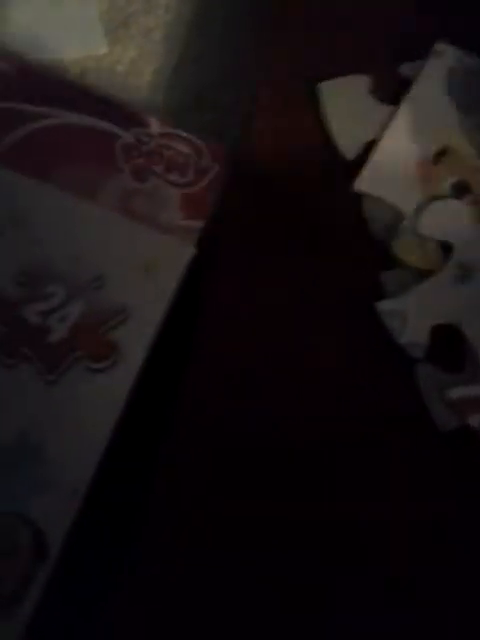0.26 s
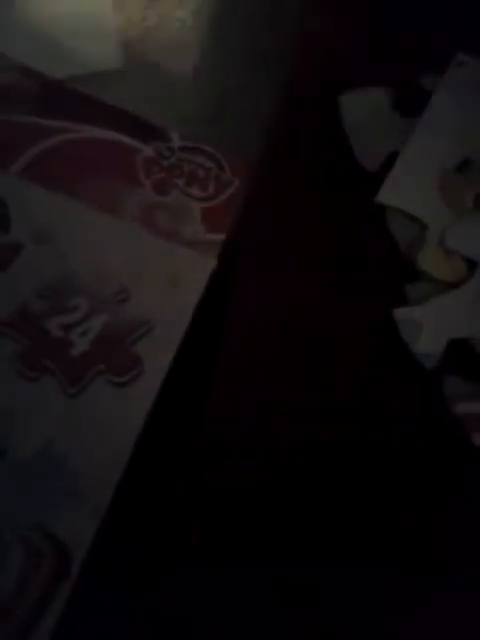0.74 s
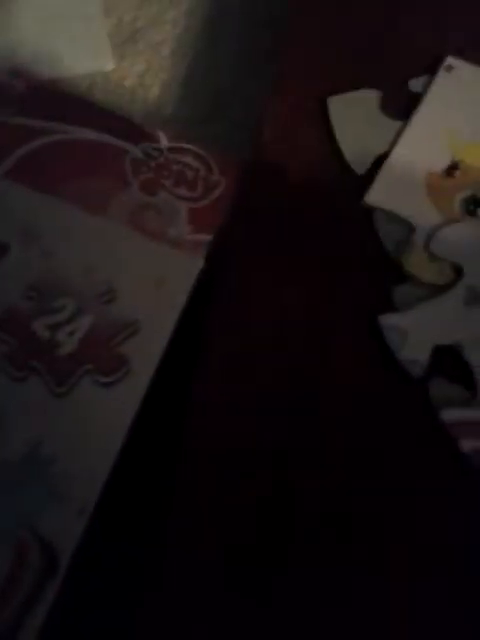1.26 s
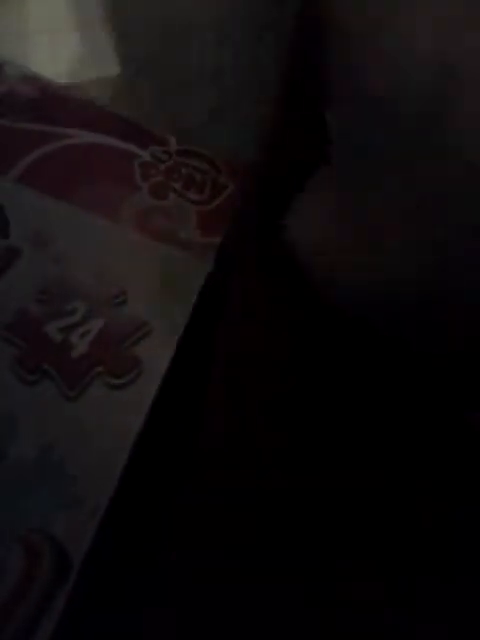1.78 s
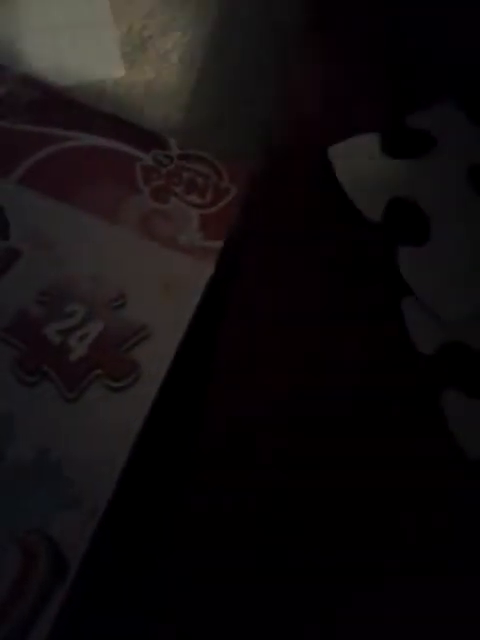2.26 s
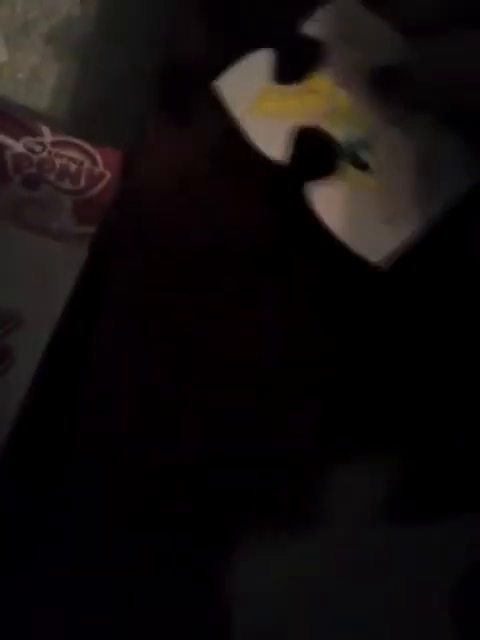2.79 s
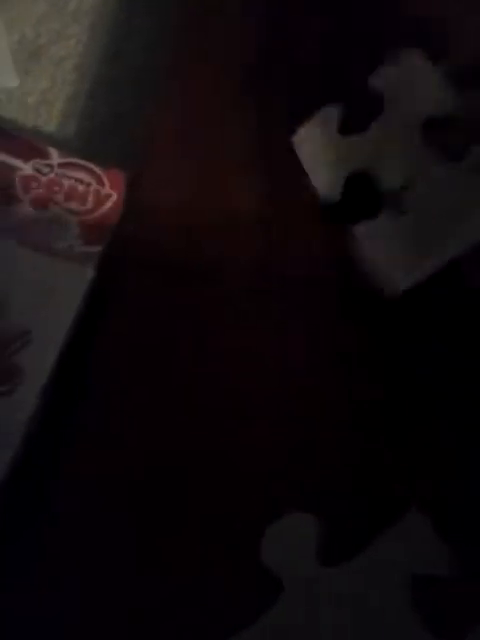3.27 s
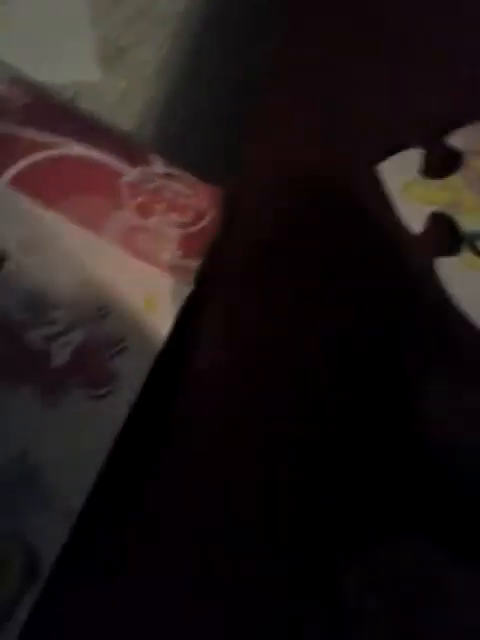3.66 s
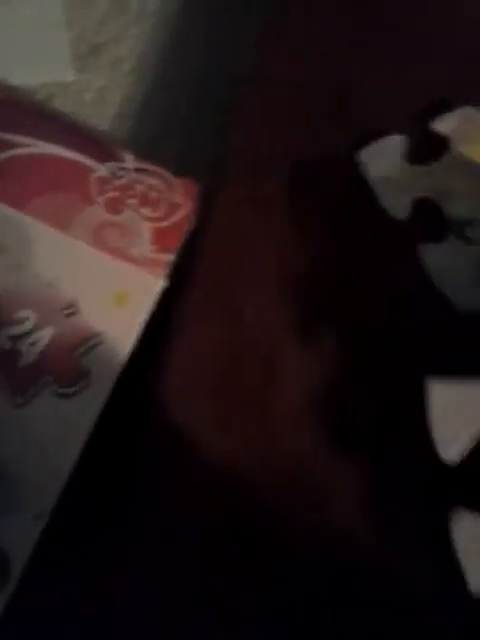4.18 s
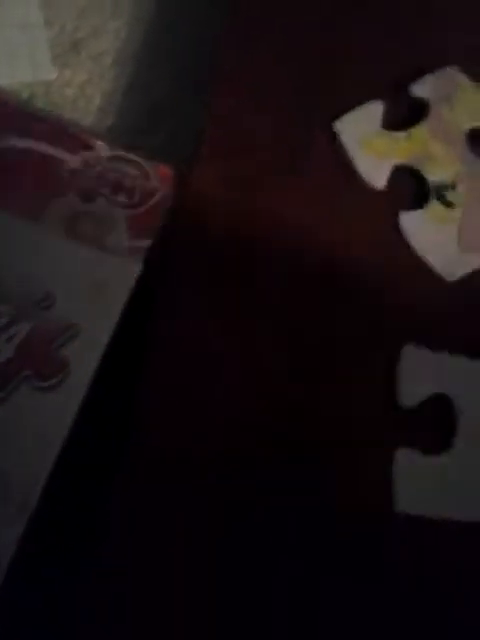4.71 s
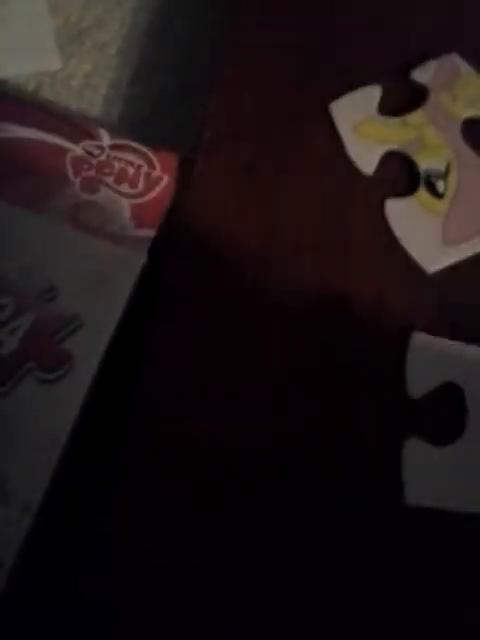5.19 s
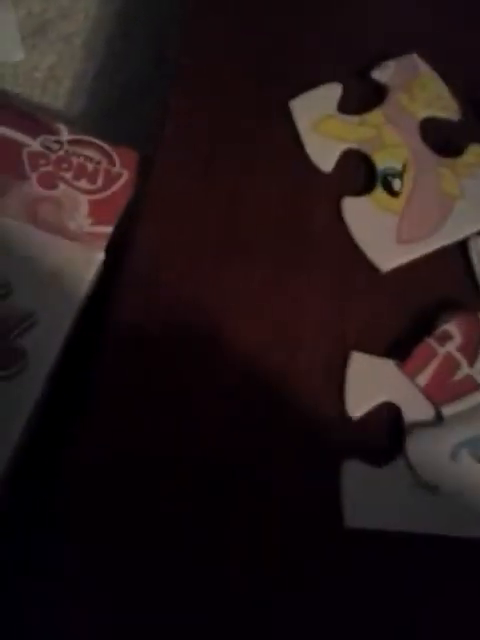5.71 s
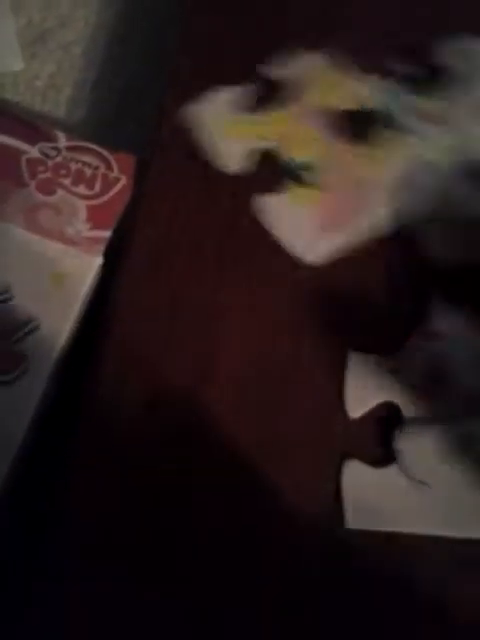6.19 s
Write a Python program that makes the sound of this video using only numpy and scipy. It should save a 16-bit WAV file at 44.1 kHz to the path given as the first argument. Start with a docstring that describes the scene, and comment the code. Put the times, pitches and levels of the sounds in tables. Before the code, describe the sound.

In a small, quiet room, cardboard puzzle pieces scrape and tick against each other as they are pushed about a tabletop. The table answers with dull knocks and a soft rumble. After a busy start and a short lull come more sliding, two quick clusters of crisp clicks and one last sharp snap. Everything is heard from very near, over faint background hiss and rumble.

```python
"""Jigsaw pieces on a hollow board.

Cardboard pieces are stirred, slid and pressed together close to a phone. Fibres catch and slip in
scuffs and scrapes; knocks ring the card's edges and bend its faces. The board rumbles and thumps
under the hand and carries low jolts to the phone. A small room answers, over faint rumble and hiss."""
import sys
import numpy as np
from scipy import signal
from scipy.fft import rfft, irfft
from scipy.io import wavfile
from scipy.ndimage import uniform_filter1d

SR = 44100
rng = np.random.default_rng(int(sys.argv[2]) if len(sys.argv) > 2 else 0)


def put_to_file(sound):
    """Save the sound as 16-bit audio at rate SR, in the file named by the first command-line argument."""
    columns = np.atleast_2d(sound).T  # one column per channel
    safe = np.clip(columns, -1, 1)
    whole_steps = np.round(safe * 32767)
    wavfile.write(sys.argv[1], SR, whole_steps.astype(np.int16))


N = 284445
EVENT_SAMPLES, KNOCK_SAMPLES = 8192, 2048


def undb(db):
    return 10 ** (np.asarray(db) / 20)


def unit_rms(x):
    return x / np.sqrt(np.mean(x ** 2))


def highpass(x, hz, order=2):
    return signal.sosfilt(signal.butter(order, hz, "high", fs=SR, output="sos"), x)


def ring(x, response):
    return irfft(rfft(x) * response, len(x))


def add(track, start_s, sound, peak_db):
    i = int(start_s * SR)
    n = min(len(sound), N - i)
    track[i:i + n] += undb(peak_db) * sound[:n] / np.max(np.abs(sound))


def resonances(modes, size, extra_db=0, widen=0.82, stretch=0.87, in_phase=False):
    """Frequency response of damped modes; signs alternate unless in phase."""
    f = np.fft.rfftfreq(size, 1 / SR)[:, None]
    hz, width, db = np.transpose(modes)
    hz, width = hz * stretch, width * widen
    sign = 1 if in_phase else (-1) ** np.arange(len(hz))
    loss = 1j * f * width
    return np.sum(sign * undb(db + extra_db) * loss / (hz ** 2 - f ** 2 + loss), axis=1)


def tuned(modes, hz, db_per_octave, detune):
    """Stretch and gains [dB] that put the nearest mode on hz, and scatter and weaken the rest."""
    mode_hz = np.array(modes)[:, 0]
    nearest = np.argmin(np.abs(np.log2(mode_hz / hz)))
    scatter = detune * rng.standard_normal(len(modes)) * (np.arange(len(modes)) != nearest)
    octaves = np.abs(np.log2(mode_hz / mode_hz[nearest]))
    return hz / mode_hz[nearest] * (1 + scatter), -db_per_octave * octaves


def grit(size, spread_db):
    """A tiny impact at every sample, most faint, a few large."""
    return rng.standard_normal(size) * undb(spread_db * np.minimum(rng.exponential(size=size), 5))


def grain_db(level_db, smooth_db=-67):
    """Spread of the fibre catches: faint strokes are grainy, louder ones even."""
    return np.clip(1.2 * (smooth_db - level_db), 0.3, 2.7)


def bursts(t, hold_s=0.0011):
    """Random steps of unit spread."""
    return rng.standard_normal(400)[np.minimum(t / hold_s, 399).astype(int)]


def drift(rate_hz):
    """Random levels joined by ramps."""
    hold = int(SR / rate_hz)
    return 1.67 * uniform_filter1d(np.repeat(rng.standard_normal(N // hold + 1), hold), hold)[:N]


# Noise floor: (frequency [Hz], relative density [dB])
FLOOR_SPECTRUM = [(12, -47.5), (20, -2.5), (32, -24.5), (44, -6.5), (68, -6.5), (98, -10.5), (120, -14.5),
                  (198, -15), (388, -23), (5530, -32.5), (16000, -35)]


def noise_floor(rms_db=-65):
    """Distant house rumble and microphone hiss."""
    f = np.fft.rfftfreq(N, 1 / SR) + 1
    hz, db = np.transpose(FLOOR_SPECTRUM)
    spectrum = undb(np.interp(np.log(f), np.log(hz), db))
    return undb(rms_db) * unit_rms(ring(rng.standard_normal(N), spectrum))


# Card edge, nominal modes: (frequency [Hz], width [Hz], gain [dB])
EDGE_MODES = [(2140, 1260, -0.5), (3420, 500, 4.5), (4195, 376, 5), (5160, 730, 0), (6920, 600, 4.5),
              (8230, 1060, 1.5), (9670, 510, 2), (10370, 2600, -12.5), (12000, 380, -20.5),
              (15300, 2200, -36.5)]


def edge_response(hz, size, scatter_db, below_db, above_db, detune, widen):
    """One piece's edge: a mode on hz, the rest falling by below_db and above_db per octave."""
    gain_draw, pitch_draw = rng.standard_normal((2, len(EDGE_MODES)))
    octaves = np.log2(np.array(EDGE_MODES)[:, 0] / hz)
    nearest = np.abs(octaves) == np.min(np.abs(octaves))
    focus_db = np.where(octaves > 0, -above_db, below_db) * octaves + scatter_db * gain_draw * ~nearest
    stretch = np.where(nearest, 2 ** -octaves, 1 + detune * pitch_draw)
    response = resonances(EDGE_MODES, size, focus_db, widen, stretch)
    cutoff_ratio = np.fft.rfftfreq(size, 1 / SR) / (2.59 * hz)  # soft card acts as a low-pass
    return response / (1 - cutoff_ratio ** 2 + 1.3j * cutoff_ratio)


# Card face, nominal bending modes: (frequency [Hz], width [Hz], gain [dB])
FACE_MODES = [(602.4, 66.5, -5), (725, 57, -4), (810, 91, -6.5), (1086, 80, -10), (1448, 145, -12),
              (1810, 860, -19.5)]
# Tearing fibres, nominal bands: (frequency [Hz], width [Hz], gain [dB])
RASP_BANDS = [(11600, 5000, 18), (15200, 3450, 2)]
# Strokes: (time [s], edge rms before envelope [dB], length [s], edge pitch [Hz], rasp re edge [dB])
SCUFF_STROKES = [(0.022, -62, 0.088, 6800, -3), (0.12, -41.5, 0.06, 3740, -25),
                 (0.206, -32.5, 0.028, 5300, -17), (0.374, -51, 0.046, 5700, -10),
                 (0.415, -49, 0.06, 5630, -3), (0.457, -44.5, 0.027, 5040, -7),
                 (0.61, -44.5, 0.083, 4300, -30), (0.732, -25.5, 0.0062, 4900, -23),
                 (0.867, -31.5, 0.012, 4830, -37), (1.165, -50, 0.055, 3900, -9),
                 (1.3, -33, 0.022, 5830, -42), (1.329, -40, 0.028, 4500, -32), (1.56, -43, 0.046, 4000, -5),
                 (1.778, -47.5, 0.04, 5170, -8), (1.859, -36.5, 0.031, 5000, -4),
                 (1.98, -43, 0.01, 3950, -10), (2.045, -32.5, 0.012, 5000, -34),
                 (2.084, -43, 0.045, 4220, -31), (2.225, -49.5, 0.063, 4170, -32),
                 (2.29, -55, .018, 4900, -39), (2.364, -39, 0.031, 5700, -2.5),
                 (2.437, -44.5, 0.065, 4630, -3.5), (2.555, -45, 0.082, 6440, 1.5),
                 (2.657, -46.5, 0.045, 2800, -1), (2.72, -27.5, 0.026, 5400, -4),
                 (3.222, -46, 0.0064, 2540, -27), (3.296, -36, 0.022, 4500, -11),
                 (3.377, -58, 0.13, 4700, -26), (3.484, -46, 0.011, 2900, -22),
                 (3.737, -47, 0.065, 6800, -1.5), (3.853, -37, 0.066, 5760, -5),
                 (3.96, -50, 0.043, 4400, 3.5), (3.977, -40, 0.03, 4400, -22), (4.05, -54, 0.017, 7250, 7),
                 (4.094, -59.5, 0.086, 4500, -7), (4.173, -65.5, 0.1, 5100, -9.5),
                 (4.29, -50.5, 0.052, 3100, -25), (4.331, -42, 0.034, 3700, -21),
                 (4.378, -40.5, 0.016, 5900, -23), (4.469, -42, 0.016, 4300, -30),
                 (4.786, -44.5, 0.059, 5000, -33), (4.886, -37, 0.023, 5200, -16),
                 (4.92, -53.5, 0.11, 3730, -11), (5.064, -40, 0.024, 4160, -28),
                 (5.168, -50, 0.023, 7500, -11), (5.2, -57, 0.13, 4820, -13), (5.275, -65, 0.056, 4100, -7),
                 (5.325, -59.5, 0.072, 8200, -15), (5.368, -31.5, 0.026, 5300, -24.5),
                 (5.421, -36, 0.019, 6200, -24.5), (5.552, -69, 0.4, 7100, -5),
                 (5.893, -57.5, 0.11, 4200, -2.5), (5.956, -52, 0.22, 6200, -6),
                 (6.033, -66, 0.076, 6000, -25), (6.124, -29.5, 0.032, 7900, -6),
                 (6.158, -48.5, 0.1, 5450, -14), (6.388, -58, 0.14, 3960, -15)]


def scuffs():
    """An edge dragged over card bites, holds and trails off; rough faces add an airy rasp."""
    out, t = np.zeros(N), np.arange(EVENT_SAMPLES) / SR
    rasp = resonances(RASP_BANDS, len(t))
    for start_s, db, length_s, hz, rasp_db in SCUFF_STROKES:
        attack = np.clip(t / (0.36 * length_s), 0, 1)
        release = undb(-60 * np.clip(t - 0.28 * length_s, 0, 1) / (3 * length_s))
        fibres = grit(len(t), grain_db(db)) * undb(1.83 * grain_db(db) * bursts(t))
        edge = edge_response(hz, len(t), scatter_db=1.6, below_db=4.5, above_db=5.0,
                             detune=0.038, widen=0.74)
        gain_draw, pitch_draw = rng.standard_normal((2, len(FACE_MODES)))
        face = resonances(FACE_MODES, len(t), 3.0 * gain_draw, widen=1.86, stretch=1 + 0.083 * pitch_draw)
        stroke = sum(undb(part_db) * unit_rms(ring(fibres, response))
                     for response, part_db in [(edge, 0), (rasp, rasp_db), (face, -4)])
        stroke *= attack * release
        add(out, start_s, stroke, db + 20 * np.log10(np.max(np.abs(stroke))))
    return out


# Sliding pieces; adjoining lists form one sweep: (time [s], edge scrape [dB], board rumble [dB])
SLIDE_SEGMENTS = [
    [(0.12, -78.5, -73), (0.2, -64.5, -78), (0.246, -57, -79), (0.33, -78, -73)],
    [(0.37, -59.5, -56.5), (0.49, -55, -47.5), (0.604, -45.5, -39.5), (0.72, -56.5, -46.5)],
    [(0.73, -56.5, -32), (0.784, -46, -40.5), (0.886, -55.5, -50.5), (0.972, -64, -58), (1.07, -87, -61)],
    [(1.17, -61.5, -56), (1.288, -67.5, -79), (1.406, -63.5, -60), (1.48, -88, -69)],
    [(1.56, -68, -39), (1.616, -64.5, -49), (1.666, -56, -59), (1.736, -58, -47), (1.79, -67, -66)],
    [(1.8, -58, -43.5), (1.938, -54.5, -44), (2.064, -58, -46.5), (2.204, -54.5, -44), (2.33, -53.5, -45)],
    [(2.34, -55.5, -49), (2.596, -49.5, -50), (2.674, -51, -65), (2.804, -58.5, -61), (2.92, -74.5, -68)],
    [(3.21, -79, -80), (3.262, -59.5, -81), (3.388, -51.5, -58), (3.562, -61.5, -50.5), (3.65, -73, -84)],
    [(3.69, -54.5, -70), (3.8, -68, -56.5), (3.878, -52.5, -47), (3.978, -53, -88), (4.06, -73.5, -77)],
    [(4.29, -64, -60), (4.444, -66.5, -73), (4.562, -81, -64.5), (4.66, -73, -78)],
    [(4.76, -67, -66), (4.832, -67, -50.5), (4.976, -56, -49.5), (5.224, -67, -62.5), (5.33, -62, -84.5)],
    [(5.37, -51, -54.5), (5.486, -67, -64.5), (5.606, -66, -68), (5.68, -78, -70)],
    [(5.9, -75, -53.5), (5.96, -70.5, -52), (6.094, -64, -58.5), (6.232, -64.5, -52), (6.31, -78.5, -60.5)],
    [(6.36, -70, -61), (6.418, -75, -50), (6.45, -79, -71)],
]


def slide_levels(times_s, still_db=-90):
    """Scrape and rumble levels [dB] as the hand sweeps the pieces about."""
    out = np.full((2, len(times_s)), float(still_db))
    for segment in SLIDE_SEGMENTS:
        knots_s, *levels = np.transpose(segment)
        out = np.maximum(out, [np.interp(times_s, knots_s, db, still_db, still_db) for db in levels])
    return out


def drifting_modes(x, modes, swing_db, rate_hz, widen=1.33):
    """Modes whose shares drift as the pieces turn."""
    out = 0
    for k, (hz, width, db) in enumerate(modes):
        band = signal.lfilter(*signal.iirpeak(hz, hz / width / widen, SR), x)
        out = out + (-1) ** k * undb(db + swing_db * drift(rate_hz)) * band
    return unit_rms(out)


# Hollow board, nominal modes: (frequency [Hz], width [Hz], gain [dB])
BOARD_MODES = [(160, 56, -3), (195, 69, 1), (261.4, 75, 1.5), (326.5, 36, -1), (413.7, 160, -1.5),
               (470, 220, -4)]


def slide(rasp_db=-24, board_share=0.68):
    """Fibres catch and slip in uneven runs; the heavy board averages them into a rumble."""
    edge_db, board_db = slide_levels(np.arange(N) / SR)
    face_db = -8.5 + (1 - board_share) * edge_db + board_share * board_db
    rub = grit(N, 4.0) * undb(0.7 * drift(55) + 1.14 * grain_db(edge_db) * drift(160) + 1.8 * drift(500))
    edge = drifting_modes(rub, EDGE_MODES, swing_db=4.0, rate_hz=17, widen=2.23)
    rasp = undb(rasp_db) * drifting_modes(rub, RASP_BANDS, swing_db=3.0, rate_hz=20)
    face = drifting_modes(rub, FACE_MODES, swing_db=4.5, rate_hz=31)
    even_rub = grit(N, 1.2) * undb(1.3 * drift(45))
    board = drifting_modes(even_rub, BOARD_MODES, swing_db=1.5, rate_hz=25)
    return undb(edge_db) * (edge + rasp) + undb(face_db) * face + undb(board_db) * board


def ticks(per_s=110, centre_hz=4344, threshold_db=-63, face_db=-3, bend_ratio=0.25):
    """Small random knocks that follow the scrape level; gentle sliding makes none. Rows as KNOCKS."""
    gap_draw, level_draw, pitch_draw = rng.random((1200, 3)).T
    times_s = np.cumsum(-np.log(1 - gap_draw) / per_s)
    scrape_db = slide_levels(times_s)[0]
    peak_db = scrape_db + 7 - 2 * np.log(1 - level_draw)
    edge_hz = centre_hz * 2 ** (0.9 * (pitch_draw - 0.5))
    rows = np.column_stack([times_s, peak_db, edge_hz])[scrape_db > threshold_db]
    return [(s, db, face_db, hz, bend_ratio * hz) for s, db, hz in rows]


# Edge on edge: (time [s], edge peak [dB], face re edge [dB], edge pitch [Hz], bend pitch [Hz])
KNOCKS = [(0.1251, -23.5, -6, 3300, 1300), (0.1444, -48, -13, 3660, 670), (0.1665, -26.5, -6, 4030, 620),
          (0.184, -31, -9, 4130, 1070), (0.2047, -22, -14, 4740, 2200), (0.2114, -15.5, -25.5, 7540, 880),
          (0.2144, -20.5, -25.5, 3300, 840), (0.2683, -36, -10.5, 2670, 850), (0.3755, -46, -6, 6790, 565),
          (0.4615, -39, 1, 5000, 850), (0.5143, -37, -6, 3890, 750), (0.5427, -31.0, -23.0, 3700, 1320),
          (0.5945, -29, -23, 2320, 2290), (0.615, -26, -17, 3550, 1070), (0.6345, -28, -2.0, 5560, 860),
          (0.6564, -28, -9.0, 4000, 965), (0.6679, -25.5, -3, 4260, 845), (0.7128, -35, -28.0, 3800, 870),
          (0.7257, -19, -13, 5100, 1440), (0.7311, -26, -10, 3200, 1420), (0.7364, -21, -12, 5040, 885),
          (0.7888, -33, -9.0, 3700, 860), (0.8649, -24, -23, 4100, 576), (0.894, -31, -3.5, 2970, 796),
          (0.9742, -50, 0, 4240, 950), (1.1762, -35.5, -3, 4070, 1390), (1.1917, -44.5, 6.5, 4140, 805),
          (1.2266, -34, 6, 3500, 814), (1.3074, -17, -12.0, 6500, 666), (1.3369, -29, -10, 4020, 2300),
          (1.3704, -39, -2, 4030, 690), (1.5638, -22.5, 1, 3774, 704), (1.73, -50, 4, 3300, 1010),
          (1.85, -28, -3, 3400, 830), (1.8624, -23, -2, 2770, 1105), (1.8726, -18.5, -9.5, 5030, 860),
          (1.902, -35, -13, 3500, 570), (1.9245, -21.5, -6, 4000, 590), (1.9314, -29.5, -18.0, 4120, 610),
          (1.949, -35, -20, 6500, 1020), (1.9739, -24.5, -23, 3280, 2300), (1.985, -33, -13, 6540, 2150),
          (2.0138, -27.5, -29.0, 3370, 720), (2.0526, -29, -4, 3600, 880), (2.076, -33, -11, 7000, 670),
          (2.0946, -24.0, -27.0, 4070, 1060), (2.109, -37, -8, 4220, 590), (2.1298, -31.5, -7.5, 3250, 938),
          (2.1435, -27, -9.0, 6650, 804), (2.188, -42, -10, 7000, 570), (2.2009, -29.5, -6, 5000, 1030),
          (2.2278, -28, -18, 3240, 1430), (2.2513, -19.5, -12, 7000, 590),
          (2.2822, -26.5, -18.0, 5050, 676), (2.3451, -18, -1, 4400, 693), (2.4773, -29, 0, 3060, 935),
          (2.6643, -24.5, -7.5, 2500, 1614), (2.7142, -17, -14.5, 4370, 714), (2.7267, -16, -26, 3660, 720),
          (2.7484, -31, -9, 3450, 600), (3.2165, -25, 1.5, 4100, 2280), (3.274, -41, -7, 4750, 1170),
          (3.2872, -35, -6, 5920, 573), (3.2984, -26.5, -10, 3330, 1265), (3.3466, -34.5, -5, 4840, 567),
          (3.3667, -29.5, -5.5, 3140, 1140), (3.475, -32, -1, 2657, 1090), (3.5404, -45.5, 5, 3700, 770),
          (3.5972, -42.5, 2.0, 2520, 620), (3.69, -54, 6, 3700, 710), (3.7209, -24.5, -2.5, 5000, 1020),
          (3.7868, -34, -3, 5500, 860), (3.85, -41, 11.5, 5000, 696), (3.8771, -26.5, -10, 4000, 750),
          (3.9926, -31.5, -9.5, 6740, 677), (4.0387, -33, -36, 5100, 776), (4.2896, -24, -1.5, 3794, 659),
          (4.3044, -34.5, 3, 3970, 667), (4.3231, -29.5, -2, 2660, 1560), (4.341, -19.5, -14.5, 3080, 1020),
          (4.372, -43, 5, 3000, 1100), (4.3838, -16.5, -20, 6840, 1580), (4.3899, -11, -20, 6470, 1590),
          (4.3925, -13, -18, 4060, 900), (4.3956, -12, -18, 6560, 640), (4.4044, -20, -13, 6500, 573),
          (4.437, -37, -13, 5000, 1200), (4.4508, -26, -12.5, 4360, 1360), (4.4742, -37.5, -4, 3960, 1620),
          (4.785, -35, -13, 3300, 600), (4.795, -32, -11.5, 4850, 627), (4.8145, -40.5, 5, 4130, 654),
          (4.8713, -25.0, -27, 4100, 590), (4.8938, -38.5, 8.5, 3200, 854),
          (4.9157, -32.5, -4.0, 4800, 625), (4.984, -34, -2.5, 2600, 600), (5.0145, -35, -9, 3680, 950),
          (5.0609, -21, -9.5, 4050, 1930), (5.075, -30.5, -12, 7300, 1240),
          (5.1904, -42.5, -2.5, 3240, 810), (5.2011, -32, -13.5, 5170, 570),
          (5.268, -40.5, -15.5, 6030, 2300), (5.3727, -8.5, -11.5, 7330, 2270),
          (5.392, -30, -12, 4000, 1500), (5.4051, -26.5, -10, 6900, 1750), (5.4251, -24, -30.5, 4300, 1560),
          (5.4311, -24, -18, 5770, 1580), (5.4331, -9.5, -19, 6800, 1560), (5.436, -6, -16.5, 6850, 1631),
          (5.4395, -6.5, -12, 6640, 1670), (5.445, -23, -15, 6800, 1500), (5.4705, -22.0, -8, 6800, 710),
          (5.4754, -25, -10, 7000, 580), (5.4884, -18, -14, 6770, 1930), (5.917, -43.5, 4, 2840, 2380),
          (5.9718, -43.5, 0, 3800, 1110), (6.127, -6.5, -26.5, 8160, 1000), (6.252, -40, -8, 3330, 940),
          (6.3747, -50.5, -17.5, 3560, 1510), (6.3824, -47, -23.0, 3150, 580)]


def clicks(chatter_t60_s=0.012, settle_t60_s=0.031, bend_t60_s=0.13, max_bend_width_hz=134):
    """Chattering contact rings the edge and bends the piece; its neighbours shift and settle."""
    out, t = np.zeros(N), np.arange(KNOCK_SAMPLES) / SR
    _, mode_width_hz, mode_db = np.transpose(FACE_MODES)
    face_widen = np.clip(max_bend_width_hz / mode_width_hz, 0.1, 2.2)
    for start_s, db, face_db, hz, bend_hz in list(KNOCKS) + ticks():
        chatter = grit(len(t), 1.0) * np.clip(t / 0.00029, 0, 1) * undb(-60 * t / chatter_t60_s)
        settle_db = -14 + 5.5 * bursts(t) - 60 * t / settle_t60_s
        settling = grit(len(t), 2.5) * undb(settle_db)
        thinning_db = 5.3 * hz / 4500  # brighter knocks have weaker low modes
        edge = edge_response(hz, len(t), scatter_db=2.5, below_db=thinning_db, above_db=7.0,
                             detune=0.048, widen=1.27)
        add(out, start_s, ring(chatter + settling, edge), db)
        stretch, focus_db = tuned(FACE_MODES, bend_hz, db_per_octave=8, detune=0.066)
        face = resonances(FACE_MODES, len(t), focus_db - 0.68 * mode_db, face_widen, stretch)
        add(out, start_s, ring(chatter * undb(-60 * t / bend_t60_s), face), db + face_db)
    return out


# Pieces and fingertips landing: (time [s], peak [dB], pitch [Hz], t60 before clipping [s])
LANDINGS = [(0.128, -25.5, 244, 0.073), (0.143, -31, 263, 0.046), (0.168, -31, 265, 0.048),
            (0.185, -34, 184, 0.03), (0.212, -22, 248, 0.049), (0.376, -33.5, 392, 0.04),
            (0.384, -29, 308, 0.029), (0.427, -35, 291, 0.043), (0.461, -31.5, 380, 0.045),
            (0.51, -45, 330, .04), (0.538, -43, 245, .04), (0.572, -43, 270, .04),
            (0.597, -29.5, 252, 0.053), (0.631, -28.5, 373, 0.054), (0.665, -27, 260, 0.037),
            (0.686, -34, 331, 0.032), (0.731, -29, 450, 0.045), (0.736, -23.5, 286, 0.039),
            (0.868, -23.5, 330, 0.068), (1.177, -30.5, 270, 0.073), (1.225, -26, 368.3, 0.088),
            (1.309, -29, 289.6, 0.087), (1.341, -28, 248, 0.09), (1.563, -22, 330, 0.019),
            (1.7, -26.5, 234, 0.022), (1.736, -35.5, 260, 0.044), (1.798, -31, 246, 0.07),
            (1.849, -24, 244, 0.032), (1.865, -32, 270, 0.058), (1.922, -24.5, 274, 0.04),
            (1.973, -34.5, 231, 0.036), (2.05, -25, 252, 0.082), (2.068, -31, 280, 0.08),
            (2.106, -30, 254, 0.053), (2.143, -31, 272, 0.051), (2.16, -26.5, 298, 0.024),
            (2.198, -28, 260, 0.079), (2.256, -33, 192, 0.045), (2.342, -27, 484, 0.067),
            (2.343, -24, 187, 0.034), (2.47, -32, 289, 0.054), (2.489, -37, 290, .04),
            (2.531, -30, 284, 0.052), (2.568, -45, 200, .04), (2.605, -34, 191, 0.04),
            (2.663, -26, 434, 0.054), (2.714, -22.5, 227, 0.044), (2.729, -20, 211, 0.029),
            (2.735, -22, 450, 0.063), (3.217, -24, 574, 0.049), (3.219, -36, 270, 0.074),
            (3.278, -39, 266, 0.045), (3.296, -35, 190, 0.069), (3.324, -33.5, 380, 0.092),
            (3.371, -33.5, 294, 0.054), (3.494, -31.5, 188, 0.03), (3.544, -39, 366, 0.048),
            (3.695, -25, 192, 0.049), (3.721, -31, 325, 0.059), (3.88, -21, 276, 0.017),
            (3.921, -25, 260, 0.022), (3.954, -33, 202, 0.063), (3.98, -39, 420, .04),
            (3.994, -34, 201, 0.041), (4.289, -24, 254, 0.027), (4.305, -31, 258, 0.04),
            (4.321, -29.5, 255, 0.045), (4.339, -35.5, 278, 0.052), (4.388, -22.5, 400, 0.035),
            (4.391, -23.5, 208, 0.08), (4.402, -26, 329, 0.077), (4.565, -44.5, 268, 0.069),
            (4.801, -38, 320, 0.058), (4.893, -24, 331, 0.069), (4.988, -44, 188, 0.069),
            (5.065, -34.5, 230, 0.054), (5.177, -41.5, 297, 0.1), (5.207, -39.5, 262, 0.051),
            (5.371, -25.5, 226, 0.062), (5.405, -28.5, 418, 0.084), (5.435, -18, 247, 0.028),
            (5.455, -25.5, 271, 0.096), (5.485, -30.5, 310, 0.02), (5.51, -39, 230, 0.048),
            (5.917, -39, 190, 0.056), (5.973, -40.5, 184, 0.073), (6.128, -28, 206, 0.025),
            (6.142, -30, 229, 0.051), (6.172, -39, 197, 0.047), (6.244, -38.5, 235, 0.072)]


def thumps(push_cycles=1.39):
    """A slap rings the board at a pitch set by place and grip."""
    out, t = np.zeros(N), np.arange(EVENT_SAMPLES) / SR
    for start_s, db, hz, t60_s in LANDINGS:
        width_hz = np.log(1000) / np.pi / np.clip(t60_s, 0.015, 0.07)
        widen = width_hz / np.array(BOARD_MODES)[:, 1]
        push = np.sin(2 * np.pi * hz * t) * np.sin(np.pi * np.clip(t * hz / push_cycles, 0, 1))
        stretch, focus_db = tuned(BOARD_MODES, hz, db_per_octave=9.5, detune=0.07)
        board = resonances(BOARD_MODES, len(t), focus_db, widen, stretch, in_phase=True)
        add(out, start_s, ring(push, board), db)
    return out


# Bumps through the board: (time [s], peak [dB])
BUMPS = [(0.379, -53), (0.429, -61), (1.565, -50), (1.7, -47), (1.906, -66), (2.347, -45), (2.374, -47),
         (3.696, -49), (3.721, -47), (3.879, -53), (3.923, -46.5), (3.952, -56), (3.996, -63), (5.436, -58)]


def jolts(hz=60.2, length_s=0.033):
    """The board carries short low pulses straight to the phone."""
    out, t = np.zeros(N), np.arange(EVENT_SAMPLES) / SR
    pulse = np.sin(2 * np.pi * hz * t) * np.sin(np.pi * np.clip(t / length_s, 0, 1)) ** 2
    for start_s, db in BUMPS:
        add(out, start_s, pulse, db)
    return out


# Room decay: (nominal band centre [Hz], t60 [s])
ROOM_DECAY = [(150, 0.33), (400, 0.22), (1000, 0.17), (2500, 0.14), (6000, 0.053), (12000, 0.01)]


def room(x, build_s=0.0062):
    """Dense echoes that die sooner in the treble."""
    t = np.arange(SR // 2) / SR
    tail = np.zeros(len(t))
    for hz, t60_s in ROOM_DECAY:
        band = ring(rng.standard_normal(len(t)), resonances([(hz, hz, 0)], len(t)))
        tail += band * undb(-60 * t / t60_s)
    tail *= np.clip(t / build_s, 0, 1)
    return signal.fftconvolve(x, tail / np.sqrt(np.sum(tail ** 2)))[:N]


def scene():
    """Near-mono mix; faint, bright, delayed copies of the knocks give the only width."""
    knocks = clicks()
    direct = knocks + scuffs() + thumps() + slide()
    direct = highpass(direct, hz=125, order=3)  # the phone's microphone rolls off the bass
    mid = direct + undb(-17) * room(direct) + jolts() + noise_floor()
    side = undb(-14) * highpass(np.roll(knocks, 40), hz=12000)
    side += undb(-34.5) * highpass(np.roll(knocks, 70), hz=1800)
    return np.array([mid + side, mid - side])


def record(dry):
    """The phone adds a small offset and cuts the top."""
    dc_offset, top_hz = 0.0015, 15900
    return signal.sosfilt(signal.ellip(8, 0.2, 70, top_hz, fs=SR, output="sos"), dry + dc_offset)


dry = scene()
out = record(dry)
put_to_file(out)
```